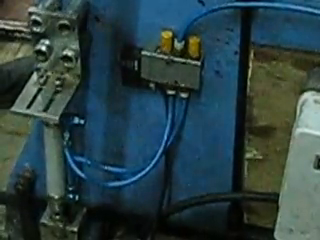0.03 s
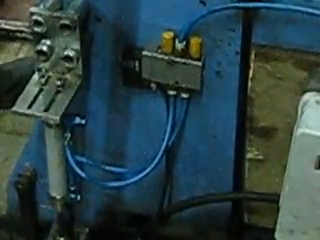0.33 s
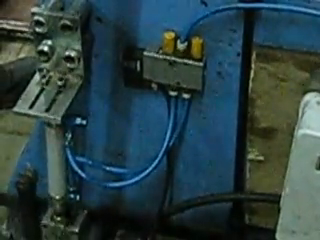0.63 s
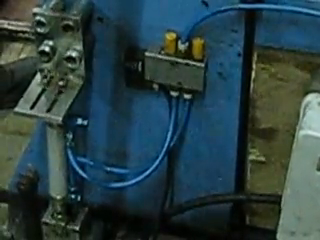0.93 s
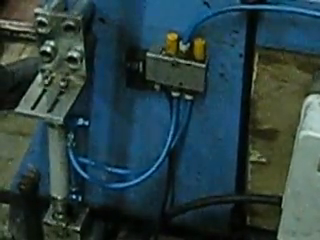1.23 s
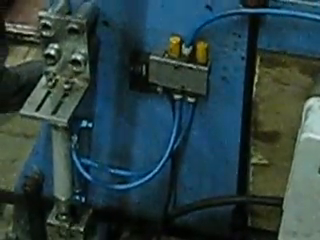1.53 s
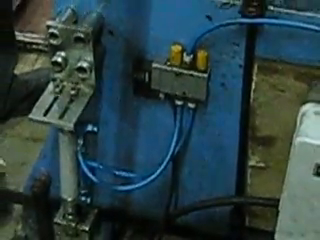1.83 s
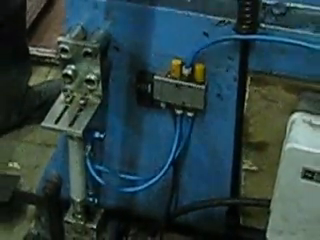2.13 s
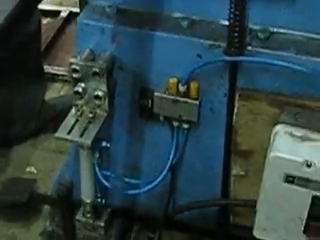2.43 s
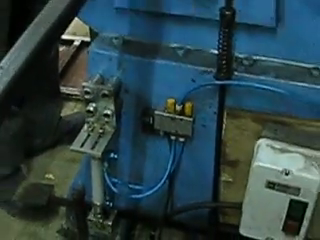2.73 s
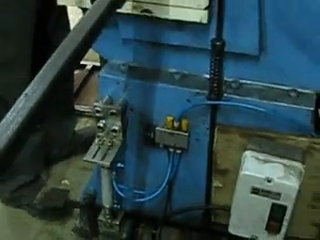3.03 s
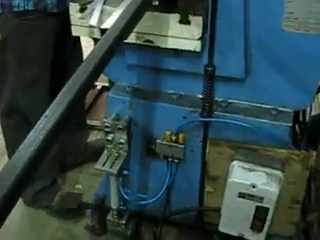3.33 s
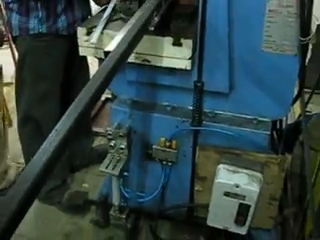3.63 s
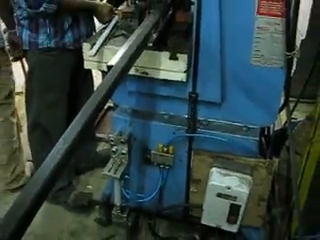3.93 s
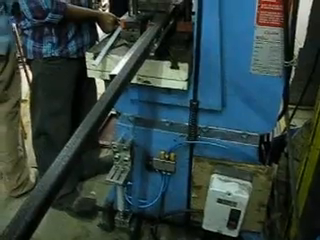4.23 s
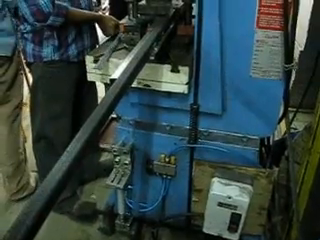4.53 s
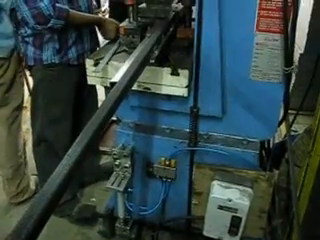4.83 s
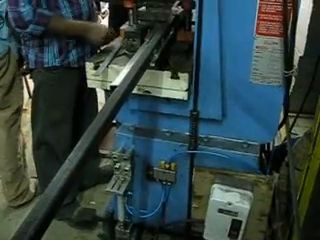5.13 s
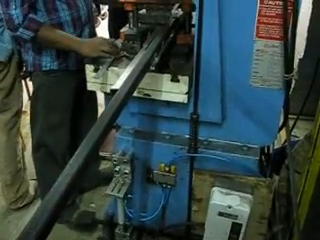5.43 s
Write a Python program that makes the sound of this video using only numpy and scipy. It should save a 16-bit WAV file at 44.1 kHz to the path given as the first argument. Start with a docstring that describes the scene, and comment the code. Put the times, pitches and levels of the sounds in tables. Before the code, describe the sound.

Steel strip rattles and rings through a rolling machine, pausing early for sharp press clanks and air bursts, over a motor's hum.

```python
"""Steel strip rattles, sways and sings through the rolls of a forming line, close by in a workshop.
The rolls chatter on the strip, and rubbing and knocking against its guides make it ring. The feed
stops, a cut-off press clanks and blows off air, a latch clicks, and the feed starts again. Behind
this a geared motor hums, whining under load, and air leaks softly. A few very sharp snaps make an
automatic gain control turn everything down; the whole shop then swells back over half a second."""
import sys
import numpy as np
from scipy import signal
from scipy.fft import rfft, irfft
from scipy.io import wavfile
from scipy.ndimage import uniform_filter1d, minimum_filter1d

SR = 44100
rng = np.random.default_rng(int(sys.argv[2]) if len(sys.argv) > 2 else 0)


def dump_mix(stems):
    """Bounce the given channels to the path in sys.argv[1] as a 16-bit WAV at rate SR."""
    frames = np.atleast_2d(stems).T  # one column per channel
    limited = np.clip(frames, -1, 1)  # hard clip at full scale
    pcm = np.round(limited * 32767).astype(np.int16)
    wavfile.write(sys.argv[1], SR, pcm)


N = 242550
T = np.arange(N) / SR

# the strip runs, stands for the cut and runs again: t/s, level/dB
FEED_LEVEL = [(.05, 0.5), (.08, -5), (.24, 0.5), (.27, -3.5), (1.22, -16), (1.28, 1), (1.7, 3.5)]
# tone colour of the rattling rolls: f/Hz, level/dB
RATTLE_COLOUR = [(200, -39), (700, -20), (950, -12), (1200, 4), (1380, -5.5), (1550, -0.5), (1800, -5.5),
                 (2100, -5), (2700, -12), (3300, -13.5), (3700, -20), (4100, -24.5), (4700, -23),
                 (6800, -42.5)]
# tones the strip sings when rubbed: f/Hz, level/dB
SINGING_TONES = [(2439, -2), (2844, -18), (3132, -17), (3989, -18), (4114, -13)]
# tones of the shaken strip: f/Hz, level/dB, fade/s (a fade, or t60, is the time to drop 60 dB)
CHINK_TONES = [(2114, 0, 0.9), (2466, 1.5, 0.21), (3957, 1.5, 0.13), (4110, -10.5, 0.072),
               (4170, -3.5, 0.18), (4070, 0, 0.029), (4060, -19, 0.062)]
# the strip knocks on its guides: t/s, level/dB, strip ring/dB
STRIP_KNOCKS = [(0.032, -26.5, -26), (1.676, -22.5, -30.5), (1.923, -20.5, -11.5), (2.005, -22, -15),
                (2.148, -11, -25.5), (2.33, -21, -13), (2.49, -14.5, -22), (2.754, -16, -23),
                (2.85, -15, -4), (2.986, -21.5, -27), (3.106, -28, -23), (3.175, -15, -15),
                (3.366, -17.5, -19.5), (3.547, -19, -17.5), (3.585, -13.5, -13.5), (3.628, -15.5, -18),
                (3.797, -14.5, -8), (3.928, -15.5, -29), (4.045, -19, -9.5), (4.114, -21.5, -15.5),
                (4.245, -18, -22), (4.379, -24.5, -19.5), (4.837, -14, -10), (4.965, -15, -12),
                (5.124, -18, -23), (5.29, -26, -13), (5.388, -29, -20)]
# the strip scrapes hard along a guide: t/s, length/s, singing/dB, rattle/dB
STRIP_SCRAPES = [(1.789, .06, -18.5, -27.5), (2.335, 0.0045, -50, -15), (2.643, 0.15, -28.5, -42.5),
                 (3.108, 0.035, -34, -34), (3.362, 0.032, -30, -34.5), (3.79, 0.065, -25, -52),
                 (4.396, .02, -48.5, -33.5), (4.708, 0.016, -13.5, -20.5), (4.857, 0.039, -15, -35),
                 (5.235, .025, -30, -29)]
# blows of the press and its stops: t/s, peak/dB, centre f/Hz, fade/s, tool ring/dB
PRESS_BLOWS = [(0.0584, 12, 2520, 0.014, -31), (0.2514, -1, 2440, 0.14, -34), (0.2837, 2, 2760, 0.15, -28),
               (0.3251, -1, 1030, 0.068, -37), (0.327, -10.5, 305, 0.12, -74),
               (0.347, -10.5, 604, 0.63, -67), (0.4536, -6, 2470, 0.074, -27), (0.48, -17, 2480, 0.2, -1),
               (0.497, -21, 3130, 0.066, -16), (.555, 12, 2590, 0.045, -24),
               (0.7051, -1.5, 2480, 0.053, -12), (0.709, 3, 2400, 0.19, 3.5),
               (0.8724, -16.5, 4200, 0.14, -40), (1.079, -32, 700, 0.49, -56),
               (1.161, -19.5, 700, 0.19, -35), (1.182, -32, 350, 0.15, -56), (1.2487, 12, 3010, 0.029, -13),
               (4.554, 13.5, 2060, 0.0074, -33.5)]
# ringing tones of the press tools: f/Hz, level/dB, fade/s
TOOL_TONES = [(1968, -6, 0.45), (2077, -14.5, 1), (2410, 1.5, 0.1), (2400, -0.5, 0.086), (2473, 3, 0.37),
              (2805, -6, 0.27), (2920, -2.5, .2), (3136, 3.5, 0.19), (3020, -6, 0.19), (3710, -14, .2),
              (3890, -12, .2), (5000, -9.5, 0.22), (5610, -12, 0.15)]
# air let out by the valves: t/s, length/s, level/dB, fade/s, tool ring/dB
AIR_PUFFS = [(0.057, 0.013, -13.5, 0.4, -55), (0.321, 0.049, -26.5, 0.4, -21.5),
             (0.451, 0.028, -23, 0.13, -17.5), (0.483, .07, -11.5, 0.071, -1.5),
             (0.559, 0.076, -16.5, 0.57, -18), (0.872, 0.0082, -19, 0.29, -58),
             (2.06, 0.038, -30, .2, -40.5), (4.837, .02, -20.5, 0.22, -44)]
# tone colour of those puffs: f/Hz, level/dB
PUFF_COLOUR = [(200, -13), (1500, 3), (2400, 7.5), (3200, 9), (4200, 4), (5600, 5), (7000, -49.5)]
# a small latch clicks home and bounces: t/s, peak/dB
LATCH_HITS = [(1.138, -10.5), (1.141, -20), (1.16, -20)]
# ringing tones of the latch: f/Hz, level/dB, fade/s
LATCH_TONES = [(2290, 3, .1), (2480, 5.5, .07), (3370, 2, 0.056), (4100, -7, 0.045), (4840, 5, 0.051),
               (5430, -1, .04), (5560, -16, 0.075)]
# hum of the gears: multiple of the shaft rate, level/dB
HUM_TONES = [(3, -55.5), (8, -51), (11, -38.5), (12, -34), (26, -39.5), (29, -43.5), (32, -37), (36, -39)]
# the hum drops as the drive idles during the cut: t/s, level/dB
HUM_LEVEL = [(.2, -3.5), (.35, -4.5), (1.25, -9), (1.6, 1.5)]
# whine of the gears, close tones that beat together: f/Hz, level/dB
WHINE_TONES = [(981, -12), (994.5, -5.5), (1008, -14), (1022, -7.5), (1044, -8)]
# the whine follows the load on the gears: t/s, level/dB
WHINE_LEVEL = [(0, -32), (.25, -56.5), (2.12, -56.5), (2.25, -19), (2.8, -23), (5.5, -25)]
# tone colour of the rumbling frame: f/Hz, level/dB
RUMBLE_COLOUR = [(20, -29.5), (45, -6), (62, -31.5), (100, -6.5), (140, -9.5), (180, 0.5), (250, -0.5),
                 (350, -4.5), (500, 1.5), (750, 0), (1200, -9), (2500, -11.5), (4000, -15.5), (6800, -43.5)]
# the press thrums as its ram returns: t/s, level/dB
RAM_LEVEL = [(.1, -49), (.3, -54), (.55, -26), (.75, -33.5), (.95, -38), (1.2, -37), (1.3, -28.5),
             (1.5, -70)]
# tone colour of that thrum: f/Hz, level/dB
RAM_COLOUR = [(30, -24.5), (75, -21), (115, -2.5), (160, -14), (220, -4), (300, 1), (600, -23), (3000, -58)]

SHAFT_HZ = 25
SWAY_HZ, SWAY_PEAK_S = 4.293, 3.585  # the strip presses on its guides once a swing


def rolls():
    """Six sets of rolls chatter on the strip, a bit harder twice a shaft turn, much harder in a scrape."""
    rattle = sum(chatter(per_second=80, scatter_db=4, t60=0.045) for _ in range(6))
    throb = 1 + 0.021 * np.sin(2 * np.pi * 2 * SHAFT_HZ * T)
    scraping = sum(undb(db) * scrape(start, length) for start, length, _, db in STRIP_SCRAPES)
    force = contact(base_db=-24.5, sway_db=1.9) + scraping
    return colour(rattle * throb, RATTLE_COLOUR) * force


def strip_singing(pitch_wander=0.003497, flutter_db=3):
    """Rubbing on the guides keeps the strip's tones singing in a shifting mix."""
    singing = np.zeros(N)
    for hz, db in SINGING_TONES:
        phase = 2 * np.pi * np.cumsum(hz * (1 + pitch_wander * drift(130))) / SR
        singing += undb(db) * unit(np.sin(phase) * undb(flutter_db * drift(45)))
    grip = curve(FEED_LEVEL) ** 2  # the singing dies first as the strip slows
    scraping = sum(undb(db) * scrape(start, length) for start, length, db, _ in STRIP_SCRAPES)
    return singing * (grip * contact(base_db=-39, sway_db=0) + scraping)


def strip_knocks():
    """Each knock is a spray of tiny bounces and a ring; the rolls shake the same tones into chinking."""
    bounce_colour = [(300, -20), (1300, 7), (2300, 7.5), (4200, -4.5), (7000, -33.5), (12000, -39.5)]
    bounces = colour(chatter(per_second=840, scatter_db=-1, t60=0.0088), bounce_colour)
    knock_level = sum(undb(db) * decay(start, t60=0.14) for start, db, _ in STRIP_KNOCKS)
    strip_ring = ring(CHINK_TONES)
    shaking = chatter(per_second=55, scatter_db=7.5, t60=0.034)
    chinks = unit(through(shaking, strip_ring)) * contact(base_db=-36, sway_db=2)
    kicks = taps((start, db) for start, _, db in STRIP_KNOCKS)
    return knock_level * bounces + chinks + through(kicks, unit_peak(strip_ring))


def press(band_ratio=1.4):
    """Each blow is a burst of noise around its own pitch; blows and puffs of air ring the tools."""
    clanks = np.zeros(N)
    for start, db, hz, t60, _ in PRESS_BLOWS:
        band = signal.butter(2, [hz / band_ratio, hz * band_ratio], "band", fs=SR, output="sos")
        clanks += undb(db) * unit_peak(signal.sosfilt(band, noise()) * decay(start, t60))
    puff_level, air_on_tools = np.zeros(N), np.zeros(N)
    for start, length, db, t60, ring_db in AIR_PUFFS:
        flow = ((T >= start) & (T < start + length)) + decay(start + length, t60)
        puff_level += undb(db) * flow
        air_on_tools += undb(ring_db) * flow
    bass_cut = signal.butter(2, 1200, "high", fs=SR, output="sos")  # the tools' ringing stays above about 1.2 kHz
    tool_ring = signal.sosfilt(bass_cut, ring(TOOL_TONES))
    kicks = taps((start, db) for start, *_, db in PRESS_BLOWS)
    push = kicks / np.abs(tool_ring).max() + air_on_tools * noise() / np.linalg.norm(tool_ring)
    puffs = puff_level * colour(noise(), PUFF_COLOUR + [(10000, -18)])
    return clanks + through(push, tool_ring) + puffs


def latch():
    """A light steel part rings with short, bright tones each time it hits."""
    return through(taps(LATCH_HITS), unit_peak(ring(LATCH_TONES)))


def drive(shaft_wander=0.00093, whine_wander=0.002616):
    """The frame rumbles; the gears hum at multiples of the shaft rate and whine under load."""
    effort = curve(HUM_LEVEL)
    rumble = undb(-26) * effort ** 0.34  # follows about a third of the hum's change in dB
    shudder = undb(-24.5) * swell(peak_s=2.3, rise_s=0.041, hold_s=0, t60=1)  # the gears take up load
    frame = colour(noise(), RUMBLE_COLOUR) * (rumble + shudder) * undb(0.36 * drift(40))
    turns = np.cumsum(SHAFT_HZ * (1 + shaft_wander * drift(6))) / SR
    hum = sum(tone(multiple * turns, db) for multiple, db in HUM_TONES)
    uneven_time = T + np.cumsum(whine_wander * drift(15)) / SR
    whine = sum(tone(hz * uneven_time, db) for hz, db in WHINE_TONES)
    return frame + hum * effort + whine * curve(WHINE_LEVEL)


def ram():
    """The press gives a low thrum as its ram, the moving part, returns."""
    return colour(noise(), RAM_COLOUR) * curve(RAM_LEVEL)


def air_leak():
    """Air escapes from the lines with a faint, steady hiss."""
    return colour(noise(), [(500, -25), (3000, -5), (5600, 3.5), (7000, -18.5)]) * undb(-49)


def contact(base_db, sway_db):
    """Gain of a strip sound: it follows the feed, and grows and shrinks with each swing."""
    swing = np.cos(2 * np.pi * SWAY_HZ * (T - SWAY_PEAK_S))
    return curve(FEED_LEVEL) * undb(base_db + sway_db * swing)


def scrape(start, length):
    """Pressure of one hard scrape."""
    return swell(start, rise_s=0.021, hold_s=length, t60=0.1)


def chatter(per_second, scatter_db, t60):
    """Small random hits on a part that rings briefly at many pitches."""
    hits = rng.random(N) < per_second / SR
    strength = undb(scatter_db * np.clip(noise(), -2, 2))
    return unit(through(hits * strength, noise() * decay(0, t60)))


def ring(tones):
    """The fading tones of a steel part after one tap."""
    t = T[:SR]
    return sum(undb(db) * np.sin(2 * np.pi * hz * t) * decay(0, t60)[:SR] for hz, db, t60 in tones)


def taps(rows):
    """One sharp tap for each row of t/s, level/dB."""
    hits = np.zeros(N)
    for start, db in rows:
        hits[int(start * SR)] += undb(db)
    return hits


def tone(cycles, db):
    """A pure tone of average (rms) level db, starting anywhere in its cycle."""
    return np.sqrt(2) * undb(db) * np.sin(2 * np.pi * (cycles + rng.random()))


def through(x, response):
    """Play x through a part or a room, given its response to one tap."""
    return signal.fftconvolve(x, response[:SR])[:N]


def colour(x, points):
    """Shape the lows and highs of x by rows of f/Hz, level/dB; the result has average size 1."""
    hz, db = np.transpose(points)
    freqs = np.maximum(np.fft.rfftfreq(N, 1 / SR), 1)
    gain = undb(np.interp(np.log(freqs), np.log(hz), db))
    return unit(irfft(rfft(x) * gain, N))


def swell(peak_s, rise_s, hold_s, t60):
    """A gain that rises to 1, holds and dies away."""
    rise = np.clip(1 + (T - peak_s) / rise_s, 0, 1)
    return rise * np.exp(-np.log(1000) * np.maximum(T - peak_s - hold_s, 0) / t60)


def decay(start, t60):
    """A gain that jumps to 1 and dies away."""
    return (T >= start) * np.exp(-np.log(1000) * np.maximum(T - start, 0) / t60)


def curve(rows):
    """Gain over time from rows of t/s, level/dB."""
    return undb(np.interp(T, *np.transpose(rows)))


def drift(per_second):
    """A glide between random values, of average size 1."""
    return unit(np.interp(T * per_second, np.arange(2000), rng.standard_normal(2000)))


def noise():
    """Fresh white noise."""
    return rng.standard_normal(N)


def unit(x):
    """Scale to an average (rms) size of 1."""
    return x / np.sqrt(np.mean(x ** 2))


def unit_peak(x):
    """Scale to a peak of 1."""
    return x / np.abs(x).max()


def undb(db):
    """Turn decibels into a gain."""
    return 10 ** (np.asarray(db) / 20)


def scene():
    """Drive, ram and leaking air fill the shop evenly; the sharp metal sounds echo from its walls."""
    metal = rolls() + strip_singing() + strip_knocks() + press() + latch()
    background = ram() + air_leak()
    walls = noise() * decay(start=0.0072, t60=0.36)
    echo = undb(-12) * through(metal, walls / np.linalg.norm(walls))
    return (metal + echo + drive() + background)[None]


def record(dry, ceiling_db=-9, recovery_db_per_s=34, soften_hz=5900, top_hz=6900):
    """The gain control drops at once on a loud peak and climbs back steadily; high treble is cut."""
    over_db = np.maximum(20 * np.log10(np.abs(dry[0]) + 1e-9) - ceiling_db, 0)
    recovered_db = recovery_db_per_s * T
    duck_db = np.maximum.accumulate(over_db + recovered_db) - recovered_db
    gain_db = uniform_filter1d(minimum_filter1d(-duck_db, size=65), size=65)  # smooth each drop
    softened = signal.sosfilt(signal.butter(5, soften_hz, fs=SR, output="sos"), dry * undb(gain_db))
    return signal.sosfilt(signal.ellip(10, .2, 80, top_hz, fs=SR, output="sos"), softened)


dry = scene()
out = record(dry)
dump_mix(out)
```